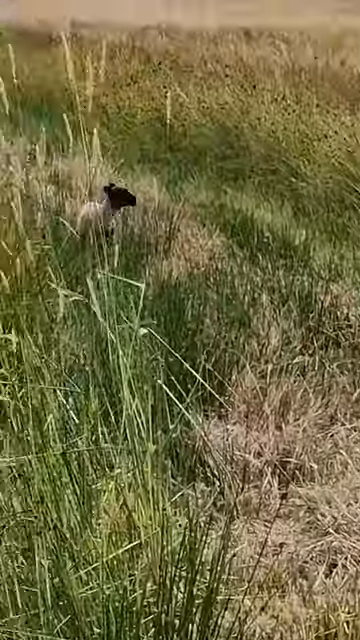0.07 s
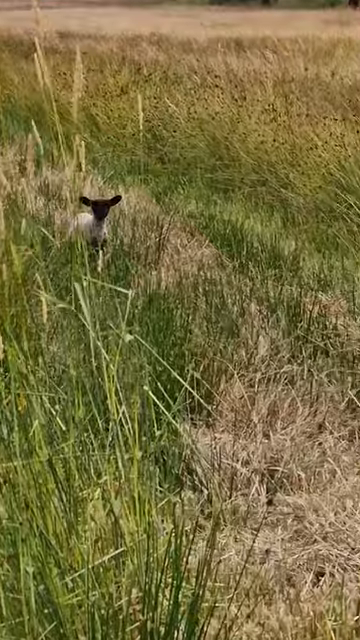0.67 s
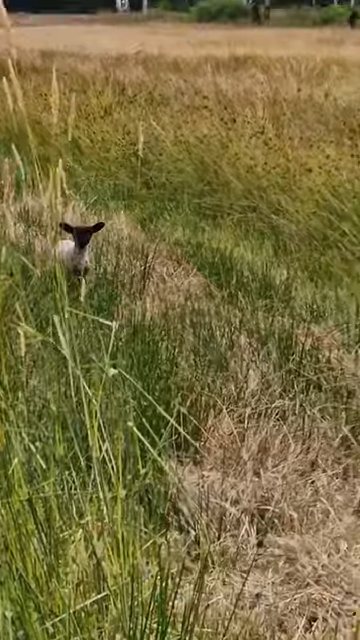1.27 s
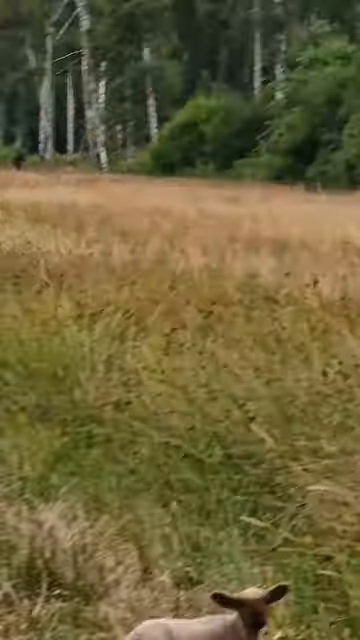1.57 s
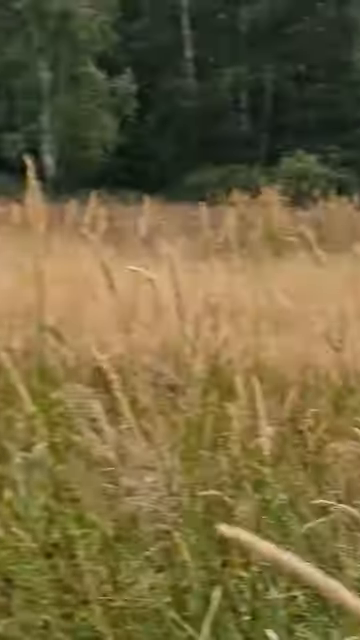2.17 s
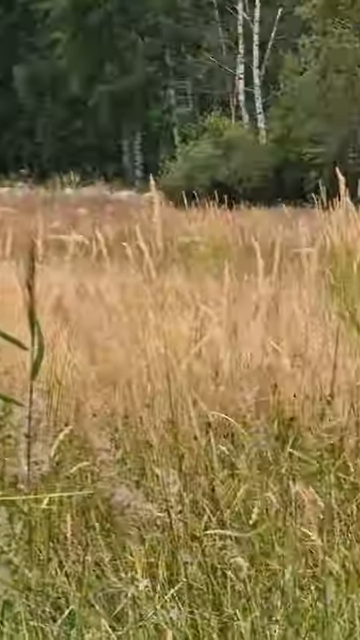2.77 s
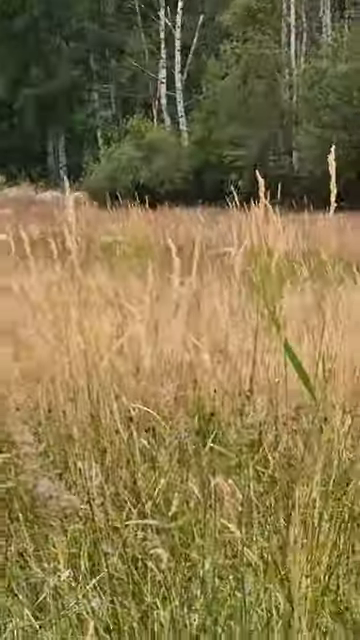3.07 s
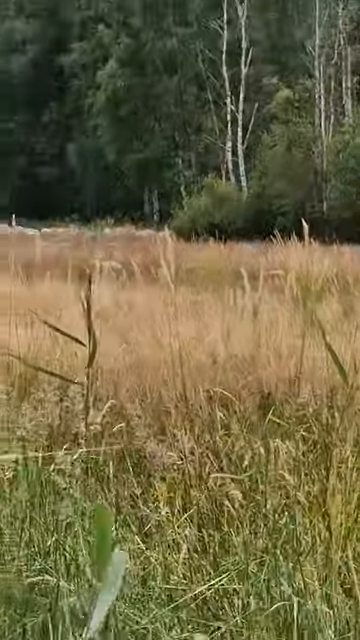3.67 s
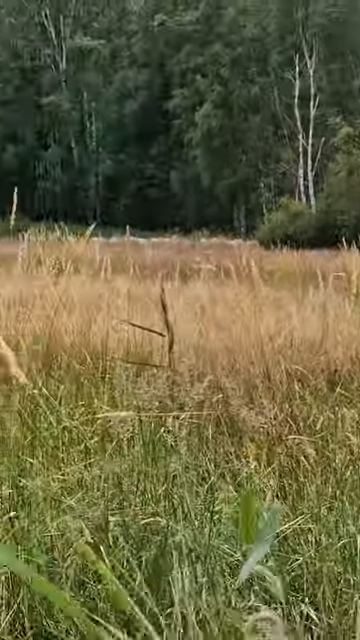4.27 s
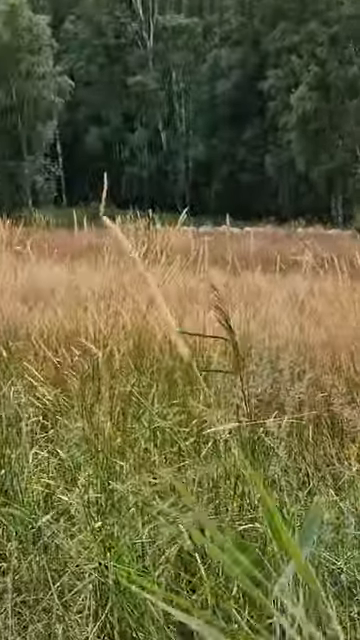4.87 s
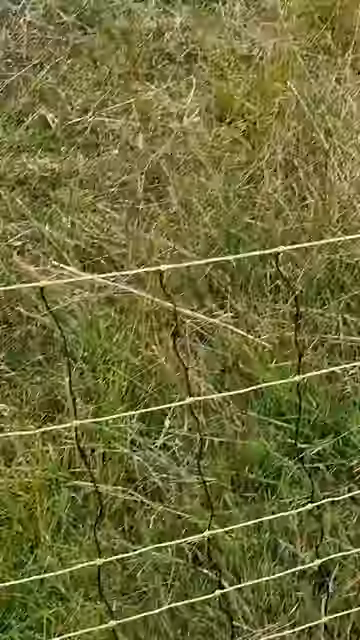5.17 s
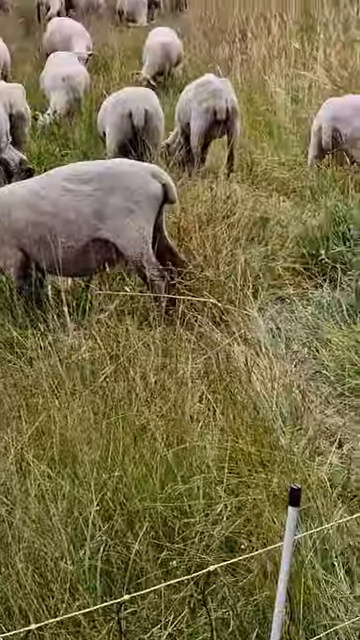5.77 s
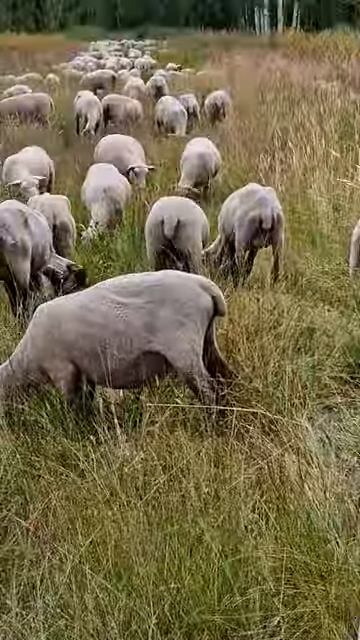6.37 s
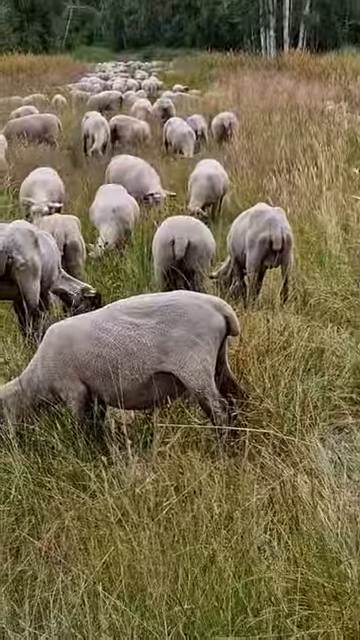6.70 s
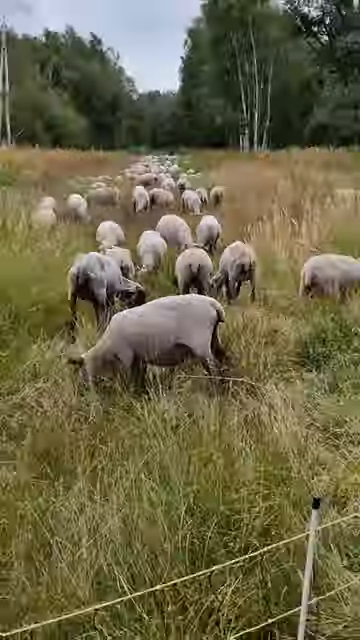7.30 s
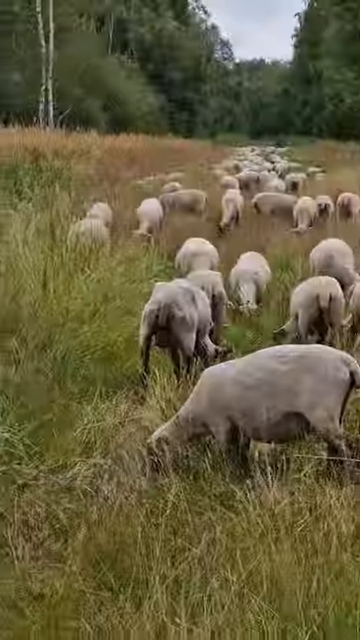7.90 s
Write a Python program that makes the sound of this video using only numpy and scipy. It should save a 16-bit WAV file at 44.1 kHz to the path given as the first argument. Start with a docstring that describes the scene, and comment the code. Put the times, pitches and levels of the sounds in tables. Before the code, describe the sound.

A lamb bleats twice in a breezy meadow, with wind rumbling on the microphone and grass faintly hissing.

```python
"""A lamb bleats twice across a meadow, a little right of the microphone: its vocal folds pulse and ring
the throat, and each bleat opens with a quaver and ends on a sagging pitch. Wind eddies buffet the
microphone, dry grass rustles close by, and far off a flock bleats and something whistles.
The sound breaks off and fades in at a calmer spot, where leaves and grass hiss in the breeze."""
import sys
import numpy as np
from scipy import signal
from scipy.fft import rfft, irfft, next_fast_len
from scipy.io import wavfile
from scipy.ndimage import uniform_filter1d, map_coordinates

SR = 44100
rng = np.random.default_rng(int(sys.argv[2]) if len(sys.argv) > 2 else 0)


def persist_wave(psi):
    """Save psi, clipped to +-1, as 16-bit WAV."""
    counts = np.round(np.clip(psi, -1, 1) * 32767).astype(np.int16)
    wavfile.write(sys.argv[1], SR, np.atleast_2d(counts).T)


N = 354563
TIME = np.arange(N) / SR
FILTER_HZ = np.fft.rfftfreq(2048, 1 / SR)


def from_db(db):
    return 10 ** (np.asarray(db) / 20)


def rms_one(x):
    return x / np.sqrt(np.mean(x ** 2) + 1e-20)


def in_time(rows):
    """The columns of a timed table, joined by straight lines."""
    seconds, *columns = np.transpose(rows)
    return [np.interp(TIME, seconds, column) for column in columns]


def at_hz(points, hz):
    """A spectrum read on a log-frequency axis."""
    point_hz, value = np.transpose(points)
    return np.interp(np.log(hz + 1), np.log(point_hz), value)


def drift(per_s, size=N):
    """A random wander of rms 1."""
    knots = rng.standard_normal(4000)
    return rms_one(np.interp(np.arange(size) * per_s / SR, np.arange(len(knots)), knots))


def bump(t, centre, width):
    """A brief swell of height 1."""
    return 1 / (1 + ((t - centre) / width) ** 2 / 2) ** 2


def band(x, low_hz, high_hz):
    return signal.sosfilt(signal.butter(2, [low_hz, high_hz], "band", fs=SR, output="sos"), x)


def coloured(x, gain):
    """Filter with the causal, quickest-dying response that has a given gain per frequency."""
    cepstrum = irfft(np.log(gain + 1e-6))
    half = len(cepstrum) // 2
    fold = np.r_[1, np.full(half - 1, 2), 1, np.zeros(half - 1)]
    response = irfft(np.exp(rfft(cepstrum * fold)))[:half]
    return signal.fftconvolve(x, response)[:len(x)]


def noise(spectrum, likeness):
    """Stereo noise of a given colour and left-right likeness; the mid signal has rms 1."""
    size = next_fast_len(N)
    hz = np.fft.rfftfreq(size, 1 / SR)
    low_hz, high_hz = spectrum[0][0] / 2, 2 * spectrum[-1][0]
    gain = from_db(at_hz(spectrum, hz)) / (1 + (hz / high_hz) ** 4) * hz / (hz + low_hz)
    alike = np.clip(at_hz(likeness, hz), 0, .99)
    white = rfft(rng.standard_normal((2, size)))
    mid, side = irfft(white * gain * np.sqrt([1 + alike, 1 - alike]), size)[:, :N]
    return np.array([mid + side, mid - side]) / np.std(mid)


def scatter(x, t60, delay_s, low_hz, high_hz):
    """Many small reflections, different at each microphone."""
    t = TIME[:SR]
    tail = band(rng.standard_normal((2, SR)), low_hz, high_hz) * from_db(-60 * t / t60) * (t > delay_s)
    return signal.fftconvolve(x.mean(0)[None], tail / np.sqrt(np.sum(tail ** 2) / 2), axes=1)[:, :N]


def breeze(far_db, near_db, murmur, hiss, flicker_db):
    """Far foliage murmurs smoothly; nearer grass and leaves hiss with a fine flicker."""
    # Open air at the two microphones. Each row: frequency in Hz, left-right likeness from 0 to 1.
    likeness = [(100, .95), (500, 0.62), (1200, 0.32), (2500, 0.26), (6000, 0), (14000, 0)]
    far = from_db(far_db) * noise(murmur, likeness)
    near = from_db(near_db + flicker_db * drift(150)) * noise(hiss, likeness)
    return far + near


def meadow_breeze():
    """Moving air stirs the meadow grass and the foliage beyond it."""
    # The breeze's strength. Each row: time in seconds, far murmur in dB, grass hiss in dB.
    levels = [(0, -54.5, -54), (.45, -60, -54), (.53, -69, -50), (.65, -59, -57), (1.4, -57, -52),
              (2.5, -53.5, -52), (3.3, -58.5, -55.5), (4.2, -56.5, -57.5), (5.1, -59.5, -55)]
    # Colours of the murmur and the hiss. Each row: frequency in Hz, relative density in dB.
    murmur = [(200, -11), (500, -3), (1150, -2.5), (1700, -3.5), (2600, -8), (4000, -9), (7000, -58)]
    hiss = [(2000, 2.5), (3500, -6.5), (5200, 0.5), (6500, -1), (7500, 3.5), (8600, -5), (10500, -4.5),
            (11600, -3), (12800, -5.5), (15500, -2.5)]
    return breeze(*in_time(levels), murmur, hiss, flicker_db=.95)


def tree_breeze():
    """At the calmer spot, leaves hiss in swells over a steady far murmur."""
    # The leaves' hiss. Each row: time in seconds, level in dB.
    leaf_levels = [(6.4, -53), (6.51, -49), (6.95, -47.5), (7.12, -55.5), (7.17, -47), (7.45, -45.5),
                   (7.55, -53.5), (7.9, -48)]
    # Colours of the murmur and the hiss. Each row: frequency in Hz, relative density in dB.
    murmur = [(150, -31), (250, -2.5), (283, 1.5), (330, 1.5), (538, -5), (784, -2), (1160, -8.5),
              (1450, -7), (1810, -12), (2000, -2.5), (2360, -12), (3030, -6), (5450, -16.5), (7000, -24),
              (9100, -58), (15400, -120)]
    hiss = [(2500, 5.5), (4500, 5.5), (5500, 12), (6400, 0.5), (7700, 4), (10200, -4), (11700, 1),
            (13000, -4.5), (15500, 1.5)]
    return breeze(far_db=-50.5, near_db=in_time(leaf_levels)[0], murmur=murmur, hiss=hiss, flicker_db=.84)


def far_flock(width_hz=390, upper_hz=2950):
    """Hoarse, quavering bleats from far off, dulled by the air and blurred by echoes."""
    # Each row: start and length in seconds, pitch in Hz, level in dB, vowel resonance in Hz,
    # upper resonance in dB against the vowel.
    bleats = [(0.328, 0.38, 270, -62.5, 1400, -5), (0.662, 0.27, 219, -62.5, 1210, -11),
              (1.029, 0.3, 237.4, -69, 1530, -13), (4.5, 0.4, 215.3, -58, 1270, -14.5),
              (4.919, 0.19, 228.6, -59.5, 1160, -12.5)]
    out = np.zeros(N)
    for start, length, pitch_hz, level_db, vowel_hz, upper_db in bleats:
        first, t = int(start * SR), TIME[:int(length * SR)]
        source = vocal_folds(pitch_hz + 5 * np.sin(2 * np.pi * 11 * t), rough=.8)
        vowel = 1 / (1 + ((FILTER_HZ - vowel_hz) / width_hz) ** 4)
        upper = from_db(upper_db) / (1 + ((FILTER_HZ - upper_hz) / width_hz / 2) ** 4)
        voice = rms_one(coloured(source, vowel + upper))
        out[first:first + len(t)] += from_db(level_db) * voice * signal.get_window(("tukey", .5), len(t))
    return (out + scatter(out[None], t60=.4, delay_s=.01, low_hz=700, high_hz=5000)) / np.sqrt(2)


def far_whistles(turn_share=.19, fade_db_per_s=12.5, edge_db_per_s=394):
    """Thin gliding whistles, made unsteady by the distance and blurred by echoes from the trees."""
    # Each row: start and length in seconds, first, middle and last pitch in Hz, relative level in dB,
    # hoarse halo in dB against the tone.
    calls = [(.64, 0.52, 1124, 1097, 1050, -59, -1), (1.395, 0.063, 1235, 1287, 1300, -56, -8),
             (1.907, .74, 988.4, 1160, 896, -49.5, -2.5), (4.596, 0.54, 1272, 1300, 1266, -63, 1)]
    out = np.zeros(N)
    for start, length, first_hz, middle_hz, last_hz, level_db, halo_db in calls:
        age = TIME - start
        before = np.clip(1 - age / length / turn_share, 0, 2)
        after = np.clip((age / length - turn_share) / (1 - turn_share), 0, 2)
        pitch = middle_hz + (first_hz - middle_hz) * before ** 2 + (last_hz - middle_hz) * after ** 1.4
        outside_s = np.clip(np.maximum(-age, age - length), 0, 1)
        db = level_db - 2 - fade_db_per_s * np.maximum(age, 0) - edge_db_per_s * outside_s
        phase = 2 * np.pi * np.cumsum(pitch * (1 + .006 * drift(60))) / SR
        halo = drift(220) * np.sin(phase) + drift(220) * np.cos(phase)
        out += from_db(db + 1.5 * drift(25)) * (np.sqrt(2) * np.sin(phase) + from_db(halo_db) * halo)
    return out + from_db(-8) * scatter(out[None], t60=.25, delay_s=.01, low_hz=700, high_hz=9000)


def stalks(snap_s=1.8686, snap_db=-16):
    """Dry stalks brush together, and one snaps close to the microphone."""
    # Each row: time in seconds, level in dB, band centre in Hz, half-length in seconds.
    brushes = [(4.774, -52, 7300, 0.032), (4.903, -57, 5200, 0.015), (5.007, -55, 5500, .012),
               (5.022, -63, 6300, .01)]
    white, out = rng.standard_normal((2, N)), np.zeros((2, N))
    for time, db, hz, width in brushes:
        swell = np.exp(-((TIME - time) / width) ** 2)
        out += from_db(db) * swell * rms_one(band(white, hz * .82, hz * 1.16))
    age = TIME - snap_s
    crack = band((age >= 0) * np.exp(-np.abs(age) / .00003) + 1e-18, 1200, 6000)
    return out + from_db(snap_db) * crack / np.abs(crack).max()


def wind(swell_db=1.3, spurt_s=.0074):
    """Eddies at the microphone: a lumpy rumble, a flutter that comes in spurts and single hard buffets."""
    # Wind at both spots in turn. Each row: time in seconds, rumble and flutter in relative dB.
    strength = [(.1, -29.5, -48.5), (.43, -28.5, -43), (.75, -33.5, -40.5), (1.0, -30.5, -52.5),
                (1.12, -29, -43), (1.62, -25.5, -42.5), (1.8, -32.5, -43), (2.3, -33, -45),
                (2.55, -29, -43), (2.7, -28, -35.5), (3.25, -26, -38), (3.7, -28, -36), (3.9, -25.5, -56),
                (4.17, -37, -50), (4.45, -31.5, -48.5), (4.72, -37.5, -57.5), (4.85, -35.5, -49),
                (5.1, -32, -51), (5.4, -52, -59.5), (6.15, -51, -63), (6.5, -40.5, -68), (6.63, -30, -68),
                (6.76, -43, -60), (7.17, -32, -54.5), (7.55, -44.5, -60), (7.9, -37, -58)]
    # Colours of the rumble and the flutter. Each row: frequency in Hz, relative density in dB.
    rumble_colour = [(18, -14), (30, -4.5), (45, 1), (72, 1.5), (110, -5), (160, -18), (250, -28),
                     (500, -41)]
    flutter_colour = [(70, -4.5), (150, 9), (210, 1.5), (300, -8.5), (450, -13.5), (700, -21.5),
                      (1200, -31), (2500, -41)]
    # The hardest buffets. Each row: time in seconds, envelope peak in dB, frequency in Hz.
    buffets = [(0.1456, -19.5, 230), (0.149, -20, 53.4), (.175, -33, 337), (0.367, -15.5, 62),
               (0.432, -13.5, 57), (0.67, -16.5, 42), (0.774, -26.5, 204), (1.076, -15.5, 67),
               (1.175, -16, 104), (1.896, -19, 41.6), (2.088, -16, 43.7), (2.699, -15, 64),
               (2.805, -14.5, 85), (3.39, -20.5, 76), (3.473, -18.5, 83), (4.389, -20, 66.4),
               (4.476, -20.5, 70.8), (5.11, -16, 53)]
    rumble_db, flutter_db = in_time(strength) + swell_db * drift(10)
    eddies = drift(35)
    rumble_gain = from_db(rumble_db + .07) * rms_one(from_db(.98 * eddies))
    rumble = rumble_gain * noise(rumble_colour, likeness=[(30, .81), (300, .95)])
    flutter_gain = from_db(flutter_db + 5.5) * rms_one(from_db(1.35 * eddies + 2.75 * drift(130)))
    for time, db, hz in buffets:
        turns = (TIME - time) * hz
        near = np.abs(turns) < 2
        rumble[:, near] -= from_db(db) * np.sin(2 * np.pi * turns[near]) * np.exp(-(turns[near] / .7) ** 2)
        # Each buffet tears loose a spurt of flutter.
        flutter_gain += from_db(db - 16.5) * hz / 100 * bump(TIME, time + spurt_s / 2, spurt_s)
    return rumble + flutter_gain * noise(flutter_colour, likeness=[(100, .9), (1000, 1.0)])


def larynx(t, start, length, top_hz, fading_db, grunt_db, rise_s, hoarse, clearing_s, clear_rough):
    """Pitch, level and roughness of a bleat: it rises, sags, and drops as the breath gives out."""
    # The quaver: catches of the larynx lift the pitch and choke the flow.
    # Each row: time in seconds, added roughness from 0 to 1, lift in Hz, choke in dB.
    catches = [(1.543, .2, 27, 2), (1.592, 0, 6, 0), (1.613, .4, 26, 6.5), (1.634, 0, -4, 0),
               (1.656, 0, 8, -1), (1.694, .1, 14, 4), (1.712, 0, -4, 0), (1.735, .1, 6, 1),
               (1.762, 0, -3, 0), (1.8, .05, 4, 0), (1.827, .1, 7, -1), (2.0, .1, 5, 1), (2.14, .4, -3, 0),
               (2.185, .3, 3, 2), (2.205, .2, -3, -1), (2.23, .35, 0, 0), (3.413, .2, 35, 2),
               (3.457, 0, 11, 0), (3.479, .3, 24, 7), (3.502, 0, -3, -2), (3.524, .1, 15, 2.5),
               (3.536, 0, -6, -1.5), (3.548, .2, 5, 1.5), (3.563, .2, -10, 0), (3.575, .2, 3, 2),
               (3.59, 0, 8, 1), (3.628, 0, 5, 0), (3.655, .35, 2, 0), (3.675, .3, 4, 0), (3.735, 0, 3, 1),
               (4.03, 0, 6, 0)]
    rise_hz, sag_hz, sag_start_s, sag_s, drop_hz_per_s = 34, 16, .29, .38, 450
    attack_db_per_s, release_db_per_s, grunt_s = 600, 280, .013
    age = t - start
    rising = np.clip(1 - age / rise_s, 0, 1)
    sagging = np.maximum(age - sag_start_s, 0) / sag_s
    dropping_s = np.maximum(age - sag_start_s - sag_s, 0)
    pitch = top_hz - rise_hz * rising ** 2 - sag_hz * sagging ** 2 - drop_hz_per_s * dropping_s
    edges_db = attack_db_per_s * np.minimum(age, 0) - release_db_per_s * np.maximum(age - length, 0)
    held_db = edges_db - fading_db * np.clip(age / length, 0, 1) ** 2
    opening_grunt = from_db(grunt_db) * bump(age, -.061, grunt_s)
    closing_grunt = from_db(-16 - fading_db) * bump(age, length + .052, grunt_s)
    db = 20 * np.log10(from_db(held_db) + opening_grunt + closing_grunt)
    # The voice clears after the opening and turns rough again as it weakens.
    rough = clear_rough + hoarse / (1 + (np.maximum(age, 0) / clearing_s) ** 10)
    rough += .085 * np.maximum(-db - 4.3, 0)
    for time, more_rough, lift_hz, choke_db in catches:
        catch = bump(t, time, width=.011)
        rough += more_rough * catch
        pitch += lift_hz * catch
        db -= choke_db * catch
    return pitch + .9 * drift(70, len(t)), db, np.clip(rough, 0, 1)


def vocal_folds(pitch, rough):
    """One closure a cycle; hoarseness makes timing and strength uneven and adds puffs of rasp and hiss."""
    size = len(pitch)
    wobble = rough * (.017 * drift(300, size) + .012 * drift(70, size))
    cycles = np.cumsum(pitch * (1 + wobble)) / SR
    pulses = rms_one(sum(np.cos(2 * np.pi * k * cycles) for k in range(1, 52)))
    air = rng.standard_normal(size) * np.exp(-3.5 * (cycles % 1))
    hiss = .4 * np.sqrt(rough) * rms_one(band(air, 6000, 15000))
    rasp = .3 * rough ** .85 * rms_one(air)
    return pulses * from_db(2.2 * rough * drift(300, size)) + hiss + rasp


def throat_gain(throat, progress, tremble, floor_db=-34):
    """Gliding resonances with steep skirts, less the notches; the small mouth radiates little bass."""
    # Side cavities swallow narrow bands. Each row: centre and width in Hz, gain in dB, glide in Hz.
    notches = [(2030, 200, -4, -100), (3280, 200, -4, 170), (4500, 180, -4, 220), (6780, 240, -10, 280),
               (8700, 140, -11, 0)]
    hz, from_middle = FILTER_HZ, progress - .5
    settling, closing = np.clip((progress - .12) / .37, 0, 1), np.clip(from_middle / .65, 0, 1)
    power = from_db(floor_db) ** 2
    for (centre, width, *levels_db, glide), (shift, swell) in zip(throat, tremble):
        start, middle, end = from_db(levels_db)
        strength = (start + settling * (middle - start) + closing * (end - middle)) * from_db(1.4 * swell)
        now_hz = centre * (1 + .013 * shift) + glide * from_middle
        power = power + strength ** 2 / (1 + ((hz - now_hz) / width * 1.27) ** 2) ** 2
    notch_db = sum(db * np.exp(-((hz - centre - glide * from_middle) / width) ** 2)
                   for centre, width, db, glide in notches)
    return np.sqrt(power) * from_db(notch_db) * hz ** 2 / (hz ** 2 + 450 ** 2)


def shaped_by_throat(source, rough, throat, hop=256):
    """Overlapping slices of the source each ring the throat as it is shaped at that instant."""
    size = len(source)
    # Each resonance trembles in pitch and strength, more so when hoarse.
    tremble = np.array([[drift(28, size), drift(28, size)] for _ in throat]) * (.45 + rough)
    out, window = np.zeros(size + 6 * hop), signal.get_window("hann", 2 * hop)
    for i in range(0, size - 2 * hop, hop):
        gain = throat_gain(throat, (i + hop) / size, tremble[:, :, i + hop])
        out[i:i + 6 * hop] += coloured(np.pad(source[i:i + 2 * hop] * window, (0, 4 * hop)), gain)
    return out[:size]


def bleat(row, throat, shade, closing_s=.022):
    """Sharp closures of the vocal folds ring the throat; the shutting mouth colours the end."""
    # The shut mouth. Each row: frequency in Hz, relative gain in dB.
    closed_mouth = [(1100, 8.5), (2100, 19.5), (2600, -9.5), (3000, 16), (3700, 8), (5400, 0), (7200, 7.5)]
    start, length, level_db, *manner, lag_s = row
    first, last = int((start - .09) * SR), int((start + length + .1) * SR)
    t = TIME[first:last]
    pitch, db, rough = larynx(t, start, length, *manner)
    voice = shaped_by_throat(vocal_folds(pitch, rough), rough, throat)
    muffled = coloured(voice, from_db(at_hz(closed_mouth, FILTER_HZ)))
    shut = np.clip((t - start - length) / closing_s, 0, 1)
    right = voice + shut * (muffled - voice)
    shaded = coloured(right, from_db(at_hz(shade, FILTER_HZ)))
    left = map_coordinates(shaded, [np.arange(len(t)) - lag_s * SR], order=3)
    running_rms = np.sqrt(uniform_filter1d(((left + right) / 2) ** 2, size=2400))
    stereo = np.array([left, right]) / running_rms * from_db(db + level_db)
    return np.pad(stereo, ((0, 0), (first, N - last)))


def lamb():
    """Two bleats across the meadow, scattered by the grass nearby and faintly by the forest edge."""
    # Each row: start and length in seconds, level in dB, top pitch in Hz, fading by the end in dB,
    # opening grunt in dB, pitch rise in seconds, opening hoarseness from 0 to 1, clearing time in
    # seconds, hoarseness once clear from 0 to 1, lag at the left microphone in seconds.
    bleats = [(1.566, .673, -30, 296, 7.5, -22, .27, .2, .29, .12, .000003),
              (3.433, .64, -32.2, 297, 4, -10.5, .35, .6, .135, .05, .000022)]
    # Throat and mouth resonances. Each row: centre and width in Hz, relative dB at the start,
    # middle and end of the bleat, glide in Hz.
    first_throat = [(892, 110, -15, -8.5, -22, -33), (1038, 91, 1, 8.5, 6.5, 20),
                    (1480, 270, -34, -5, -5, -43.5), (2594, 320, 8, 10, 10, -54),
                    (3570, 810, 3.5, 4, 2.5, 60), (4700, 840, 11.5, 4, -10, 248.5),
                    (5450, 550, 2, 4.5, 7.5, 118), (7600, 630, 2.5, -10, -13, -300),
                    (9070, 440, -5, -8, -13, 199), (11800, 3700, -18, -28, -18, 99)]
    second_throat = [(890, 73, -30, -5, -12, -30), (1104, 64, -4, 0.5, -1, 14.5),
                     (1540, 530, -28, -15.5, -11, -40), (2595, 223, 8, 6.5, 7, -48),
                     (3840, 1080, 4.5, -1, -3.5, 60), (5310, 480, 12, 7, 14.5, 128),
                     (5920, 950, 4, 0, 9, 353.5), (7500, 900, 5, -2, -5, -200),
                     (9000, 430, -2, -16, -30, 83), (11440, 280, -13, -10, -26, -100),
                     (13800, 3000, -18, -27, -31, 0)]
    # The left microphone faces away from the lamb. Each row: frequency in Hz, left minus right in dB.
    first_shade = [(700, 2), (1250, 2), (2400, -3.5), (3500, -6.5), (5000, -7.5), (7300, -13.5),
                   (9000, -7.5), (13000, 1.5)]
    second_shade = [(700, -4), (1250, 4), (2400, -2.5), (4200, -1), (5400, -9.5), (7400, -17.5),
                    (9000, -6.5), (11500, -5)]
    voice = from_db(.07) * sum(map(bleat, bleats, (first_throat, second_throat), (first_shade, second_shade)))
    grass = from_db(-14) * scatter(voice, t60=.02, delay_s=.0008, low_hz=4500, high_hz=14000)
    forest = from_db(-32) * scatter(voice, t60=.6, delay_s=.04, low_hz=700, high_hz=5000)
    return voice + grass + forest


def scene(break_s=5.113, resume_s=5.335, fade_in_s=.069):
    """The meadow, a short silence, then the calmer spot fading in."""
    gusts = wind()
    meadow = lamb() + far_whistles() + far_flock() + stalks() + meadow_breeze()
    fade_in = (TIME > resume_s) * (1 - .77 * np.exp(-np.maximum(TIME - resume_s, 0) / fade_in_s))
    return (meadow + gusts) * (TIME < break_s) + (tree_breeze() + gusts) * fade_in


def record(dry):
    """The treble is cut steeply above 15850 Hz."""
    return signal.sosfilt(signal.ellip(12, .1, 80, 15850, fs=SR, output="sos"), dry)


dry = scene()
out = record(dry)
persist_wave(out)
```